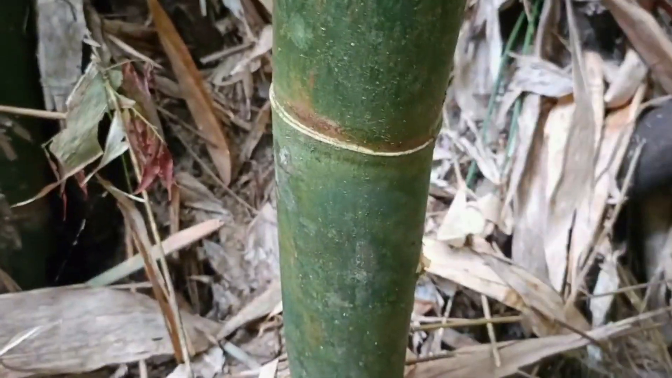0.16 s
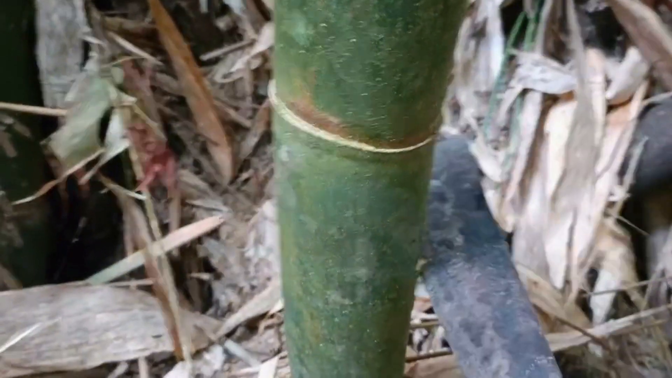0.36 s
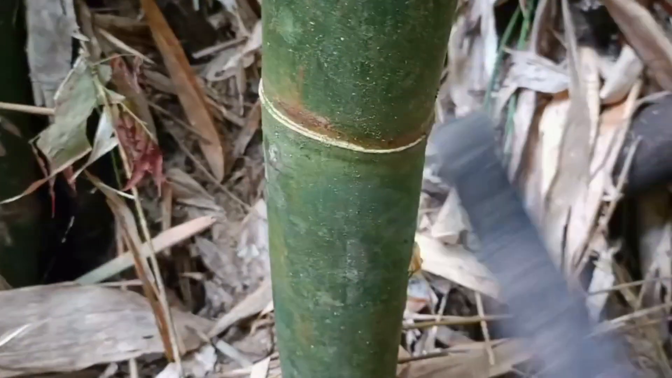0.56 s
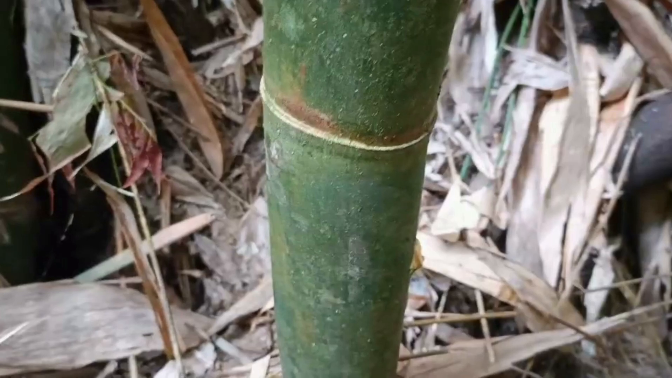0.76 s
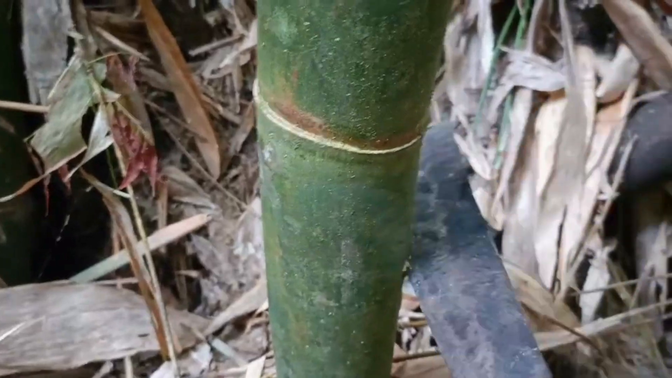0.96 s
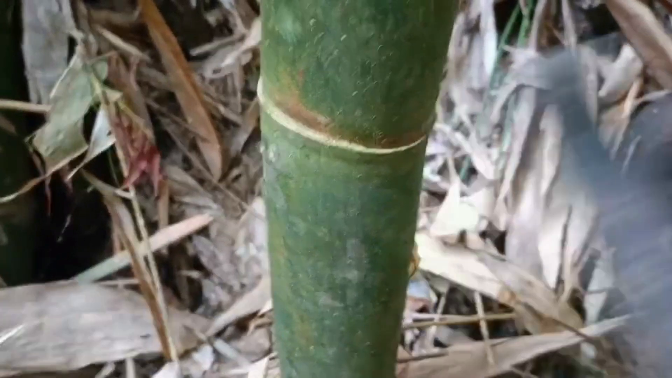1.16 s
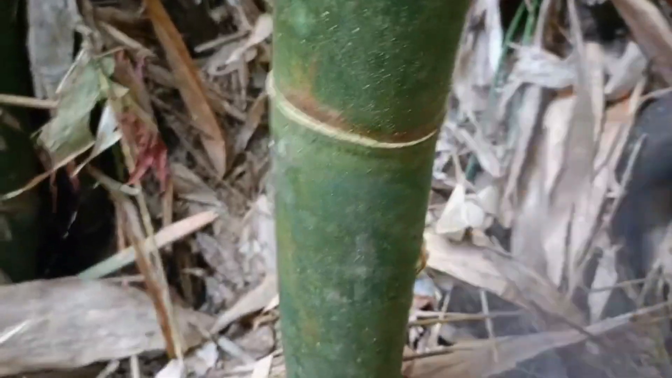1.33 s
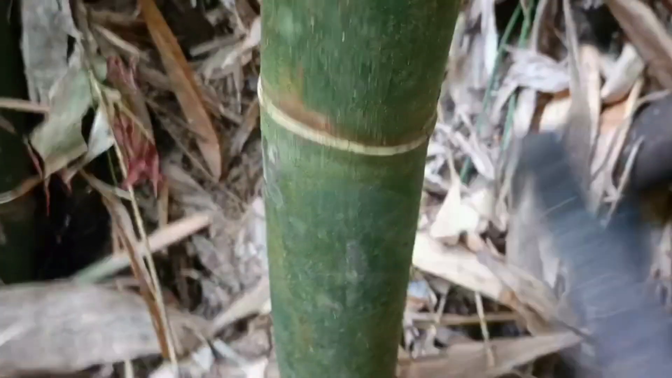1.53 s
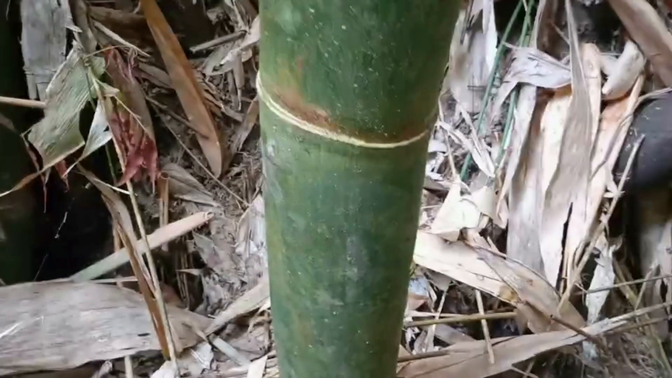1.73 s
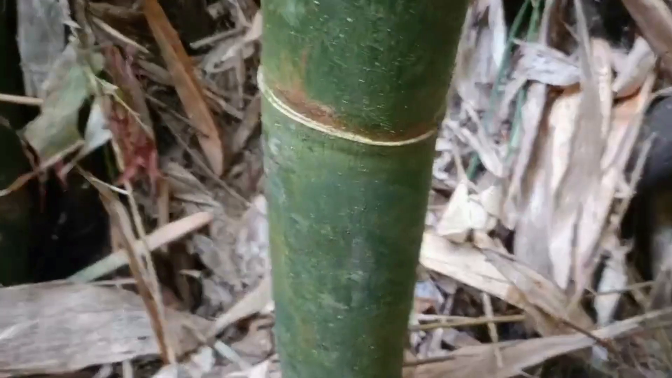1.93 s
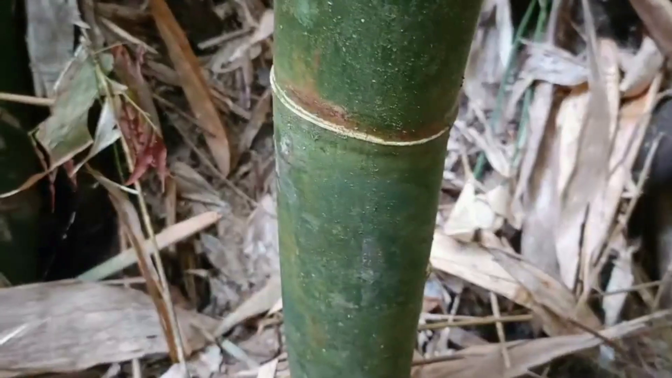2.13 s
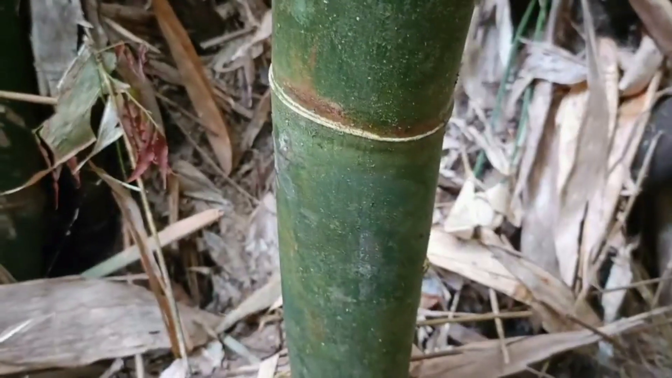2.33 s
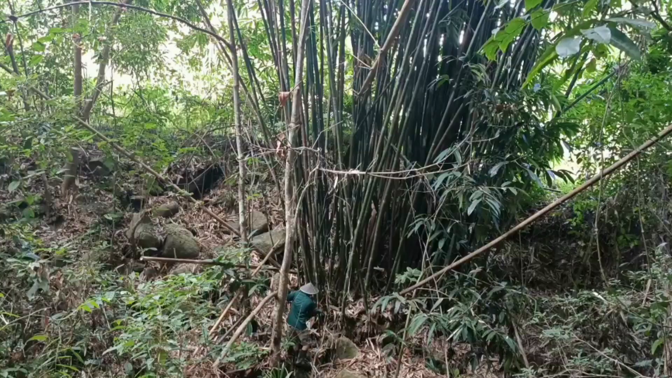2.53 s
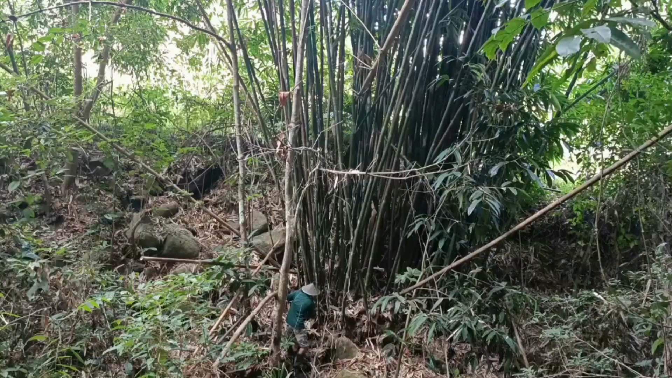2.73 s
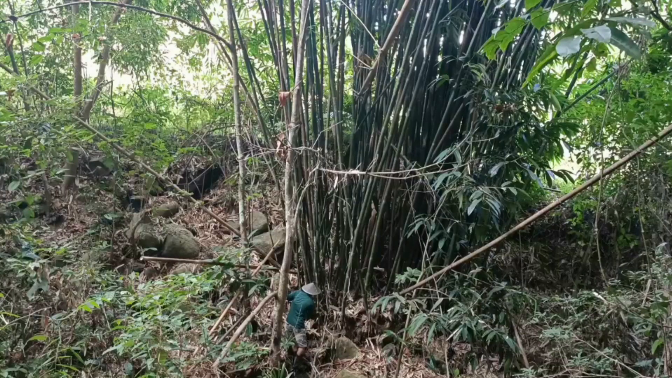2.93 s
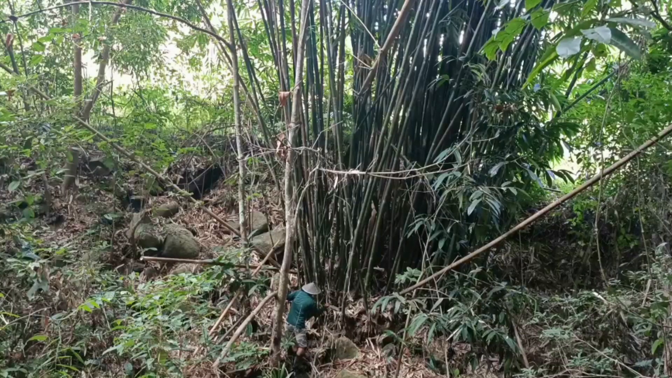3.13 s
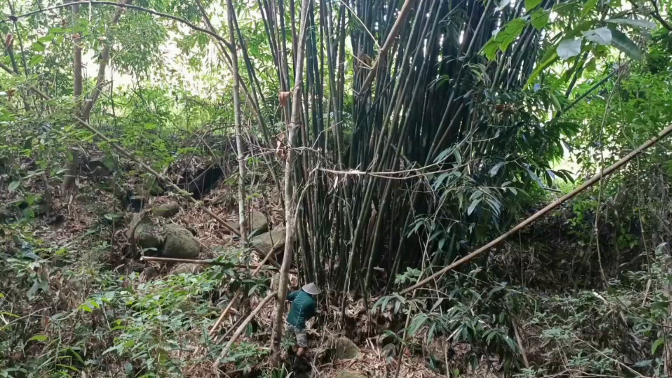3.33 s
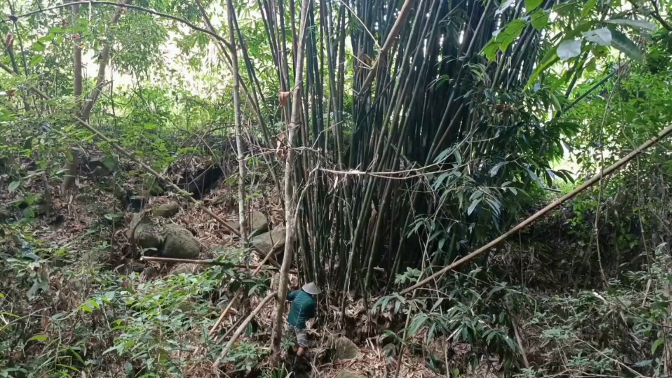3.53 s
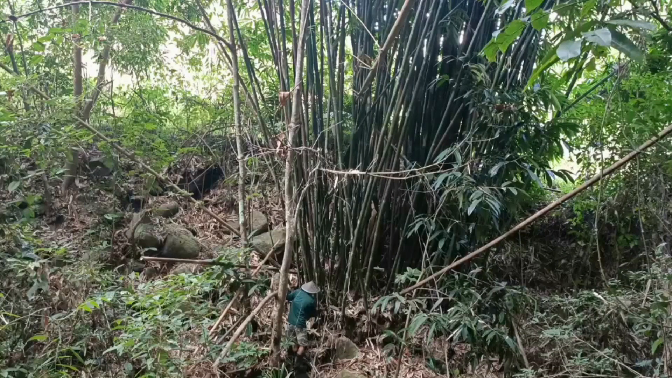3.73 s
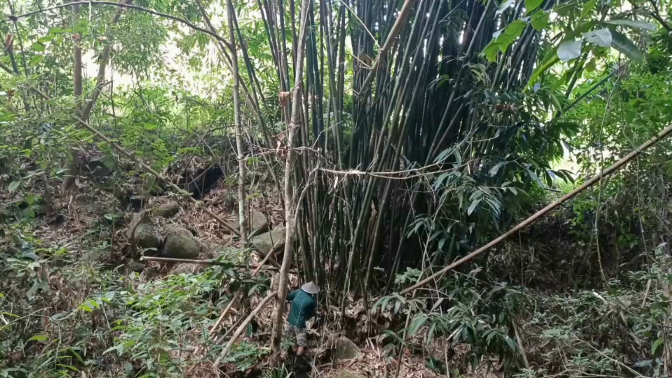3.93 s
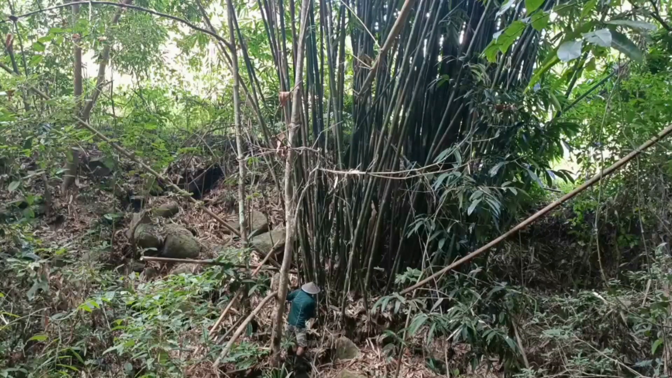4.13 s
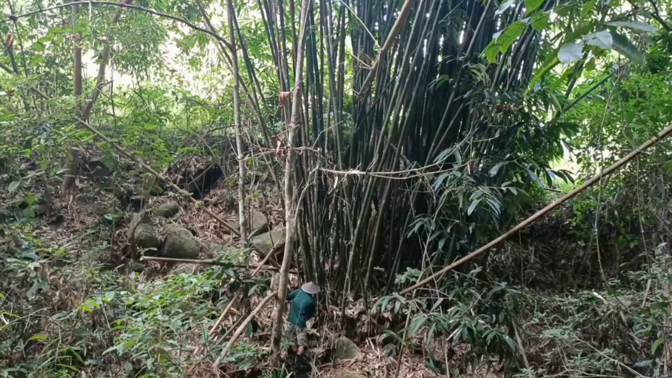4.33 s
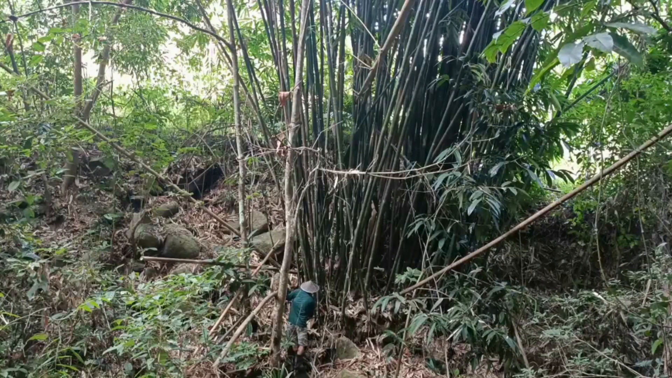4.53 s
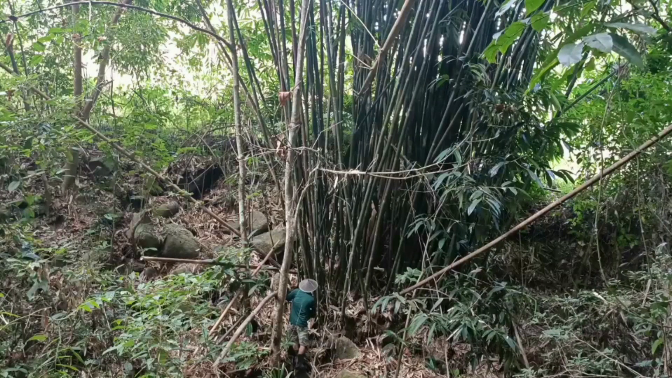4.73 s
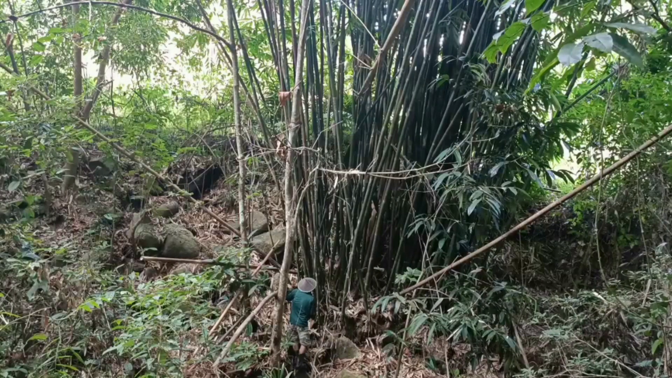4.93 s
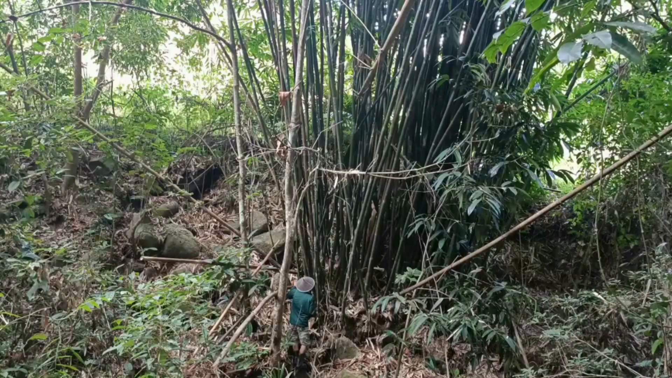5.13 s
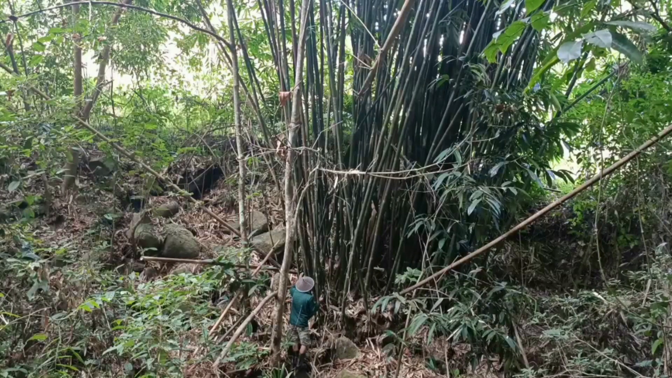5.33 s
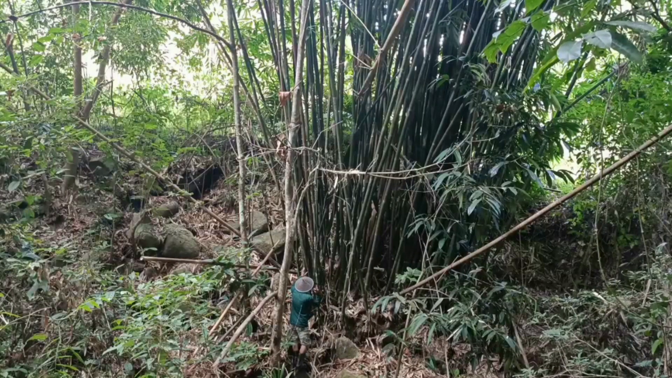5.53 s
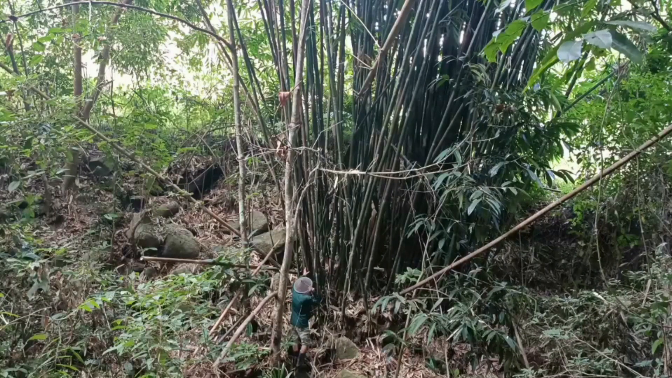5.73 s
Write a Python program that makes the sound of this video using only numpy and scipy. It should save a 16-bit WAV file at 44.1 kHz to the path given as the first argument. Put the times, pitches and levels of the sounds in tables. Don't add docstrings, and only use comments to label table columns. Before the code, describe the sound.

Close to the microphone, a blade chops green bamboo three times, each a sharp splintering crack with falling, ringing stem sweeps. Soft hollow knocks and leaf ticks fall between, then a cluster of bumps. An abrupt cut moves far across a forest slope, where thinner chops hiss off the trunks over a softer stream.

```python
import sys
import numpy as np
from scipy import signal
from scipy.fft import rfft, irfft
from scipy.io import wavfile
from scipy.ndimage import uniform_filter1d

SR = 44100
rng = np.random.default_rng(int(sys.argv[2]) if len(sys.argv) > 2 else 0)


def ratio_of_db(decibels):
    return 10 ** (np.asarray(decibels, float) / 20)


def inscribe(sig):
    pcm = np.round(np.clip(np.atleast_2d(sig).T, -1, 1) * 32767)
    wavfile.write(sys.argv[1], SR, pcm.astype(np.int16))


N = 254213

# start_s, crack_db, stem_db, crack_t60_s, duck_db (depth of the gain control's dip)
NEAR_BLOWS = [
    (0.4055, -5, -25.5, 0.037, 6),
    (1.0792, -3, -22.5, 0.038, 5),
    (1.509, -4.5, -20, 0.049, 3),
]


def evened(x):
    return x / np.sqrt(np.mean(x ** 2) + 1e-20)


def read(points, hz):
    f, value = np.transpose(points)
    return np.interp(np.log(hz + 1), np.log(f + 1), value)


def tilted(tone, tilt_db, from_hz):
    return [(f, g + tilt_db * max(np.log2(f / from_hz), 0)) for f, g in tone]


def add(mix, s, sound):
    part = mix[:, round(s * SR):][:, :sound.shape[1]]
    part += sound[:, :part.shape[1]]


def modes(table, hz):
    return sum((ratio_of_db(db) * 1j * hz * w / (f ** 2 - hz ** 2 + 1j * hz * w) for f, w, db in table), 0 * hz)


def dying(t, t60, rise):
    return (1 - np.exp(-t / rise)) * ratio_of_db(-60 * t / t60)


def top_filter(hz, edge_hz):
    return 1 / (1 + (hz / edge_hz) ** 80)


def hiss(tone, size):
    hz = np.fft.rfftfreq(size, 1 / SR)
    noise = rfft(rng.standard_normal((2, size)))
    return evened(irfft(noise * ratio_of_db(read(tone, hz)) * top_filter(hz, 14700), size))


def water(tone, pools, same, patchy_db, size):
    hop = size // 4
    frames, hz = N // hop + 5, np.fft.rfftfreq(size, 1 / SR)
    a, b, c, d, patches = rng.standard_normal((frames, len(hz), 5)).T
    patches = uniform_filter1d(patches, size=6, axis=0)
    patches = evened(uniform_filter1d(patches, size=6, axis=1))
    like = np.clip(read(same, hz), -1, 1)[:, None]
    left, other = a + 1j * b, c + 1j * d
    z = np.array([left, like * left + np.sqrt(1 - like ** 2) * other])
    z *= ratio_of_db(read(tone, hz)[:, None] + patchy_db * patches)
    z *= (1 + abs(modes(pools, hz)))[:, None]
    return evened(signal.istft(z, nperseg=size, noverlap=size - hop)[1][:, :N])


def stream(levels, burble, pools, fizz, same, patchy_db):
    burble_db, hiss_db = levels
    low = ratio_of_db(burble_db + 1) * water(burble, pools, same, patchy_db, size=2048)
    return low + ratio_of_db(hiss_db + 3) * water(fizz, [], same, patchy_db=0.98, size=512)


def far_stream():
    # burble_db, hiss_db
    levels = (-52, -51)
    # frequency_hz, density_db (per Hz)
    burble = [(15, -52), (54, -11), (120, -7), (216, -19.5), (570, -6.5), (900, -7), (1400, -14.5),
              (3080, -98)]
    fizz = [(590, -21), (1000, -3.5), (1490, 0), (2400, -3.5), (4630, -6), (7880, -12), (14400, -19.5),
            (15000, -54)]
    # frequency_hz, width_hz, level_db
    pools = [(292, 53, 17.3), (373, 60, 9), (435, 20, 15), (753, 71, 6.9)]
    # frequency_hz, coherence
    same = [(60, 0.61), (180, 0.92), (540, 0.53), (1620, -0.07), (4870, 0.11), (14600, -0.12)]
    return stream(levels, burble, pools, fizz, same, patchy_db=2.35) * ratio_of_db([[.7], [-.7]])


def near_stream():
    # burble_db, hiss_db
    levels = (-41, -42.5)
    # frequency_hz, density_db (per Hz)
    burble = [(15, -78), (59, -37), (103, -13), (176, -15), (400, -9), (1000, -8), (1400, -33),
              (3080, -120)]
    fizz = [(590, -29), (1000, -4), (1600, 3.5), (1980, 0), (4630, -3.5), (8250, -9), (14500, -13.5),
            (15000, -89)]
    # frequency_hz, width_hz, level_db
    pools = [(100, 30, 2), (276, 51, 12), (440, 160, -2.5), (846, 75, 3.5)]
    # frequency_hz, coherence
    same = [(60, 0.88), (180, 0.95), (540, 0.8), (1620, -0.21), (4870, 0.094), (14600, -0.068)]
    return stream(levels, burble, pools, fizz, same, patchy_db=3.85) * ratio_of_db([[.3], [-.3]])


def ducking():
    fall_s, recover_s = 0.03, 0.4
    starts = np.array([[row[0]] for row in NEAR_BLOWS])
    since = np.maximum(np.arange(N) / SR - starts, 0)
    dip = (1 - np.exp(-since / fall_s)) * np.exp(-(since / recover_s) ** 2)
    return ratio_of_db(-np.array([row[-1] for row in NEAR_BLOWS]) @ dip)


def bumps():
    # start_s, level_db, pitch_hz, t60_s, hardness (of first touch)
    knocks = [(0.131, -26, 460, 0.25, 0.5), (0.831, -44, 360, .09, -7), (1.89, -37, 300, 0.1, 0),
              (2.06, -30, 410, 0.11, 0), (2.197, -22, 584, 0.1, 0), (2.222, -25.5, 1030, 0.1, 12),
              (2.346, -23.5, 440, 0.31, 2.5), (2.373, -31, 950, 0.16, 9), (2.43, -24.5, 303, 0.066, 0.5),
              (2.465, -26.5, 600, .15, 1), (2.519, -21.5, 670, 0.26, 2.5), (2.539, -25.5, 500, 0.11, 1)]
    out, t, hz = np.zeros((2, N)), np.arange(8192) / SR, np.fft.rfftfreq(8192, 1 / SR)
    for s, db, note_hz, t60, hard in knocks:
        push = rng.standard_normal((3, 8192)) * dying(t, np.clip(t60, .01, .3), 0.015)
        touch = hard * np.exp(-((t - .001) / 0.00053) ** 2)
        push = push[0] + .5 * push[1:] + touch
        hollow = modes([(note_hz, 220, 0), (1.68 * note_hz, 300, -5)], hz)
        knock = irfft(rfft(push) * hollow ** 2)
        add(out, s, ratio_of_db(db - 3.5) * knock / abs(knock).max())
    return out


def crack(tone, ring, t60, ring_db, rise, size=8192):
    t, hz = np.arange(size) / SR, np.fft.rfftfreq(size, 1 / SR)
    burst = hiss(tone, size) * dying(t, np.clip(t60, .004, .6), rise)
    rung = irfft(rfft(burst) * (1 + ratio_of_db(ring_db) * modes(ring, hz)), size)
    return rung / abs(rung).max()


def stem(size=16384):
    # travel_s (at 300 Hz), strength (signed)
    returns = [(.002, .45), (.016, 0.36), (.027, -0.44), (0.0417, 0.96), (0.0494, 0.65), (0.0587, .8),
               (.066, .8), (.074, -0.59), (.085, 0.13), (.103, 0.205)]
    # frequency_hz, width_hz, level_db
    wall = [(108.5, 27, -5.5), (148, 19, -9), (203, 29, -2), (293, 42, 7), (383, 34, -2), (500, 106, -4),
            (671, 36, -13), (752, 46, -1), (972, 63, -7), (1092, 28, -7), (1300, 27, -18), (2050, 450, -13)]
    # frequency_hz, left_right_db
    stem_lean = [(60, 10), (150, -1.5), (370, -2), (940, 9), (2340, -0.5), (5840, 25), (14600, 30)]
    hz = np.fft.rfftfreq(size, 1 / SR)

    def sweep(s):
        return np.exp(-4j * np.pi * s * (np.sqrt(470 * (hz + 170)) - 283) - 0.011 * s * hz)

    main = sum(g * sweep(s) for s, g in returns)
    joints = rng.random((2, 40, 2))
    small = np.array([
        sum(0.73 * (2 * g - 1) * ratio_of_db(-13 * s ** 2) * sweep(s * .095) for s, g in ear)
        for ear in joints])
    small = small * (0.76 + 0.74 * hz ** 2 / (hz ** 2 + 480 ** 2))
    thin = 1 / (1 + (86 / (hz + 1)) ** 6)
    lean = ratio_of_db(np.outer([.5, -.5], read(stem_lean, hz)))
    wave = irfft((main + small) * modes(wall, hz) * thin * lean, size)
    return wave / abs(wave).max()


def forest(tone, ring):
    # frequency_hz, t60_s
    decay = [(250, 0.3), (1000, 0.42), (3000, 0.66), (7000, 0.68), (14000, 0.64)]
    taps = np.zeros((2, SR))
    at = np.arange(200, SR - 20, 5) + rng.integers(0, 5, (2, (SR - 216) // 5))
    np.put_along_axis(taps, at, rng.choice([-1., 1.], at.shape), 1)
    hz, t, z = signal.stft(taps, SR, nperseg=256)
    clumps = rng.standard_normal(z.shape[1:])
    clumps = uniform_filter1d(clumps, size=5, axis=0)
    clumps = evened(uniform_filter1d(clumps, size=5, axis=1))
    rung = abs(1 + 0.9 * modes(ring, hz) / (1 + (hz / 5000) ** 2))
    colour = ratio_of_db(read(tone, hz)) * rung * top_filter(hz, 14400)
    fading = ratio_of_db(2.93 * clumps - 60 * t / read(decay, hz)[:, None])
    tail = signal.istft(z * colour[:, None] * fading, SR, nperseg=256)[1][:, :SR]
    t = np.arange(SR) / SR
    slope = tail * np.exp(-((t - .075) / 0.025) ** 2)
    return tail * (1 - np.exp(-t / 0.0016)) / abs(tail).max(), slope / abs(slope).max()


def far_blows():
    # start_s, crack_db, rise_s, slope_echo_db, tilt_db (per octave)
    blows = [
        (2.558, -27, 0.0029, -22.5, -3.5),
        (2.7362, -38, 0.0017, -17, -2),
        (2.845, -15, 0.00073, -5, -0.3),
        (3.634, -13, 0.00041, -18, -1.03),
        (4.2329, -26, 0.0012, -3, 2),
        (4.268, -29, 0.031, -15, 0),
        (4.659, -31.5, 0.0052, 8, -2.5),
    ]
    # frequency_hz, density_db (per Hz)
    far_tone = [(120, -45), (220, -19), (500, -12), (1750, -5.5), (2700, -6.5), (3300, -4.5), (6500, -6),
                (14200, -17)]
    # frequency_hz, width_hz, level_db
    rings = [
        [(1100, 130, 6), (1540, 400, 5)],
        [(2200, 300, -8)],
        [(1010, 92, -9), (1480, 74, 4), (2280, 380, 3), (5200, 1200, -2)],
        [(2080, 130, 6.5), (3330, 210, -2), (6660, 350, 5)],
        [(880, 600, 5.5), (3970, 370, -8), (6850, 360, 4.5)],
        [(4030, 330, -24), (5200, 580, -20)],
        [(600, 800, 3), (2250, 59, 11), (6930, 240, 5.5)],
    ]
    t60_s, drag = 0.055, 15
    lean_db = 3
    out, wave = np.zeros((2, N)), stem()
    for (s, db, rise, late_db, tilt_db), ring in zip(blows, rings):
        tone = tilted(far_tone, tilt_db, from_hz=570)
        direct = crack(tone, ring, t60_s + drag * rise, ring_db=13, rise=rise, size=16384)
        scatter, slope = forest(tone, ring)
        scatter_db = 1.9 * min(tilt_db, 0) - 6.5
        wet = ratio_of_db(scatter_db) * scatter + ratio_of_db(late_db - 18.5) * slope
        wet[:, :direct.shape[1]] += direct
        wet[:, :wave.shape[1]] += ratio_of_db(-17) * wave
        lean = ratio_of_db(db + 4) * ratio_of_db([[lean_db / 2], [-lean_db / 2]])
        add(out, s - .0008, wet * lean)
        swish = crack(tone, ring, 0.035, ring_db=0, rise=.0002)[:, ::-1]
        add(out, s - 8192 / SR, ratio_of_db(-13.5) * lean * swish)
    return out


def near_blows():
    # frequency_hz, density_db (per Hz)
    near_tone = [(350, -26), (600, -16), (1500, -4.5), (2600, -12.5), (5000, -4.5), (8800, -20),
                 (12100, -15.5), (14600, -31)]
    # frequency_hz, width_hz, level_db
    rings = [
        [(1200, 600, -1.5), (3800, 150, 6), (4870, 140, 10), (5330, 180, -13), (6560, 520, 7.5),
         (7740, 410, 10), (11000, 1400, 8.5)],
        [(2340, 180, 1), (3350, 290, 7.5), (4640, 200, 4), (5150, 240, -3), (6870, 560, -2), (10340, 540, 4)],
        [(810, 200, 6), (1370, 77, 7), (2260, 42, 16), (3650, 170, 3), (5740, 480, 1), (7600, 240, -14)],
    ]
    # (frequency_hz, width_hz, level_db)
    twig = (2.5405, -20, [(2330, 100, 5), (3600, 110, 1)])
    # start_s, level_db
    ticks = [
        (0.833, -33),
        (0.96, -35),
    ]
    out, wave, t = np.zeros((2, N)), stem(), np.arange(8192) / SR
    for (s, db, stem_db, t60, _), ring in zip(NEAR_BLOWS, rings):
        add(out, s - .0008, ratio_of_db(db - 4) * crack(near_tone, ring, t60, ring_db=38, rise=0.0019))
        edge = crack(near_tone, ring, 0.0079, ring_db=0, rise=0.00054)
        add(out, s - .0004, ratio_of_db(db + 5) * edge)
        add(out, s, ratio_of_db(stem_db + 18.5) * wave)
        thump = np.sin(2 * np.pi * 330 * t) * dying(t, 0.016, 0.00037)
        thump = thump + 0.24 * np.exp(-((t - .006) / 0.001) ** 2)
        add(out, s - .0055, ratio_of_db(-14.5) * thump * np.array([[1.1], [.7]]))
        splinters = ratio_of_db(1.9 * evened(uniform_filter1d(rng.standard_normal(len(t)), size=90)))
        rattle = crack(near_tone, ring, 0.28, ring_db=-0.81, rise=0.0036) * splinters
        add(out, s, ratio_of_db(db - 15) * rattle)
        swish = crack(near_tone, ring, 0.073, ring_db=0, rise=0.00028)[:, ::-1]
        add(out, s - len(t) / SR, ratio_of_db(db - 16.5) * swish)
    twig_s, twig_db, twig_ring = twig
    add(out, twig_s, ratio_of_db(twig_db) * crack(near_tone, twig_ring, 0.013, ring_db=12, rise=0.0013))
    leaf_tone = tilted(near_tone, 3.1, from_hz=600)
    for s, db in ticks:
        add(out, s, ratio_of_db(db + 4.5) * crack(leaf_tone, [], .012, ring_db=0, rise=.0003))
    return out


def scene():
    # near_end_s, far_start_s
    gap = (2.5483, 2.5575)
    near_end_s, far_start_s = gap
    t = np.arange(N) / SR
    near = near_blows() + bumps() + ducking() * near_stream()
    far = far_blows() + far_stream()
    near_gate = np.clip((near_end_s - t) / 0.0014, .01, 1) * (t < far_start_s)
    far_gate = np.clip((t - far_start_s) / 0.0064, 0, 1)
    return near * near_gate + far * far_gate


def band_limit(x):
    return signal.sosfilt(signal.butter(12, 15200, fs=SR, output="sos"), x)


def record(dry):
    mix = 1.132 * np.tanh(dry / 1.267)
    return band_limit(mix)


dry = scene()
out = record(dry)
inscribe(out)
```